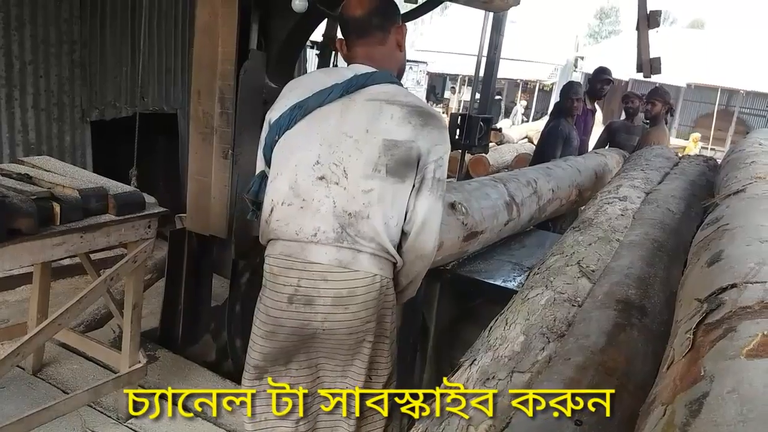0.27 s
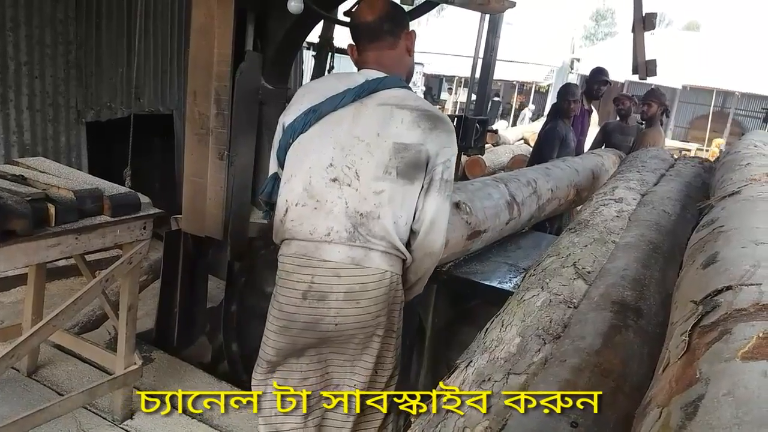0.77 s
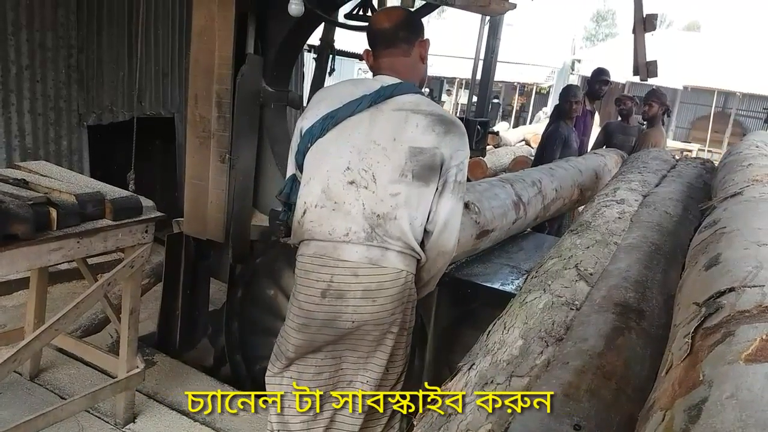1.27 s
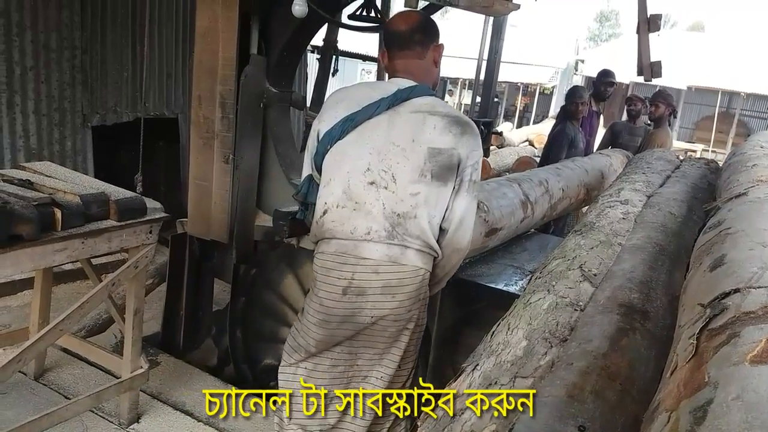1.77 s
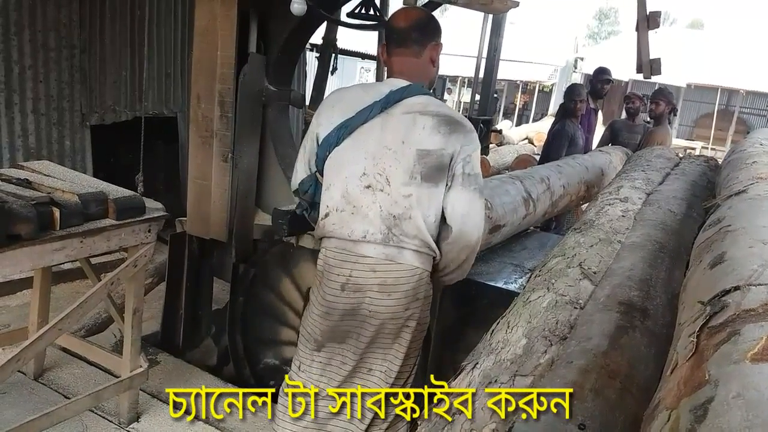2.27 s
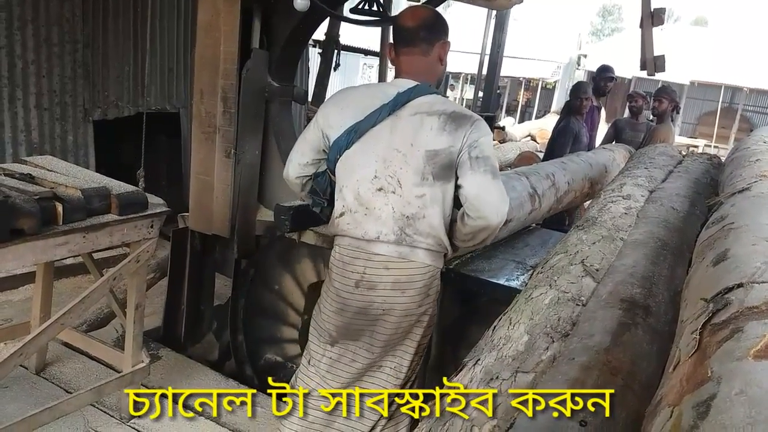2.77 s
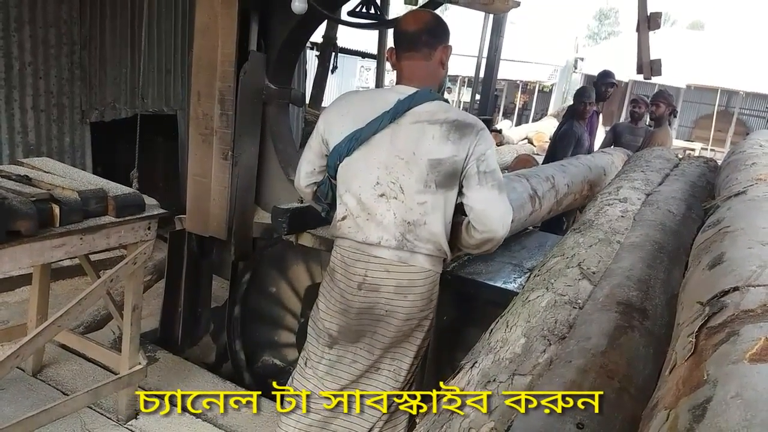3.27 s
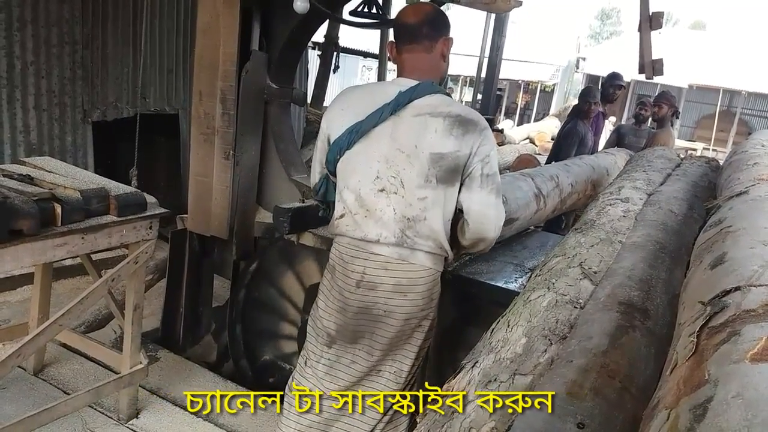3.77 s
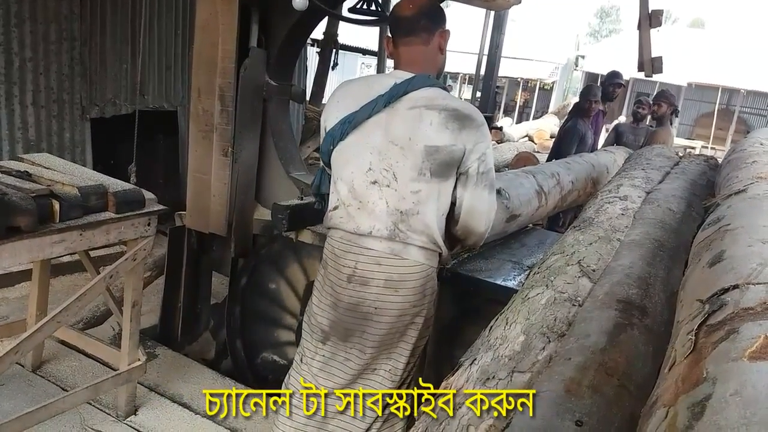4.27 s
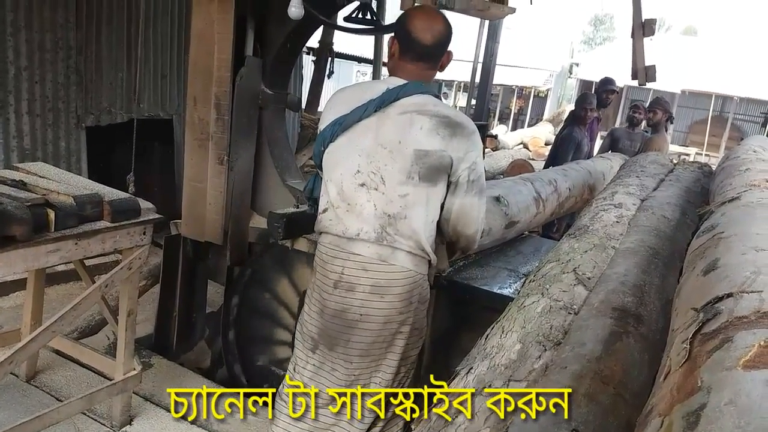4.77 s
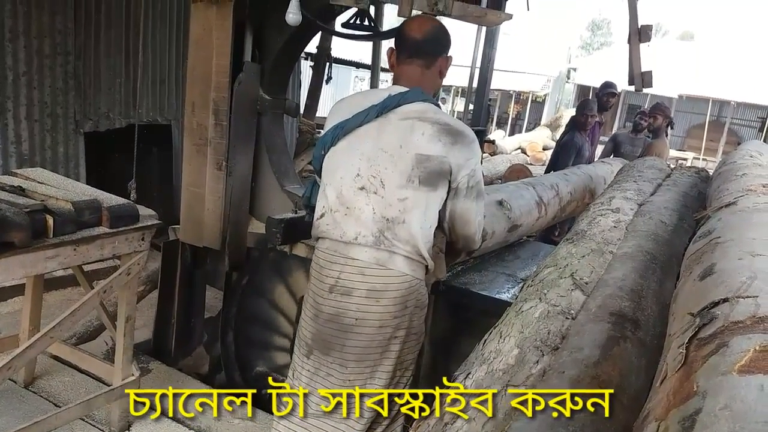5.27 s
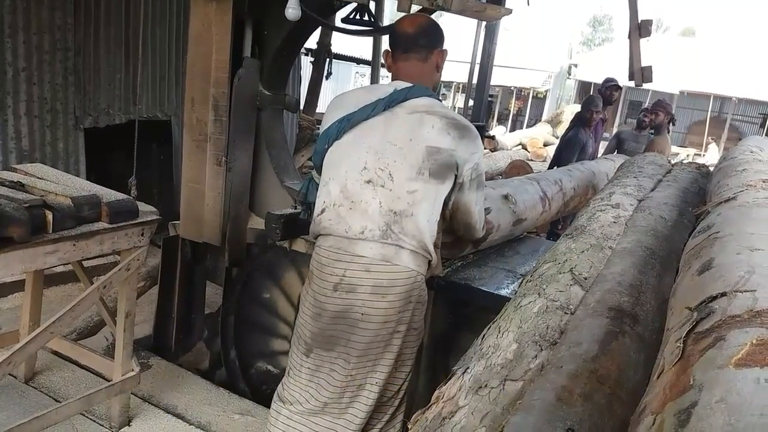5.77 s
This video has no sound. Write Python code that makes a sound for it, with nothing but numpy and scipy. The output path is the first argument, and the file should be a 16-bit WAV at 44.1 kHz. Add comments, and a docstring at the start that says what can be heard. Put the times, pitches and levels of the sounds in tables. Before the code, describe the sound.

A large band saw cuts wood with hissing and short squeals over a chugging diesel engine, then everything fades out.

```python
"""A slow diesel engine drives a band saw through a log in an open shed, heard in mono.
From the start the exhaust throbs in a fixed pattern and the block knocks once a cycle, while the blade
hisses in the wood and rings near 2 kHz. A faint hum stops after half a second. The saw squeals in
clusters and rasps where uneven teeth pass the wood, about every 0.8 s, the engine sagging at nearly
the same pace. From 2.75 s on, the whole scene fades away."""
import sys
import numpy as np
from scipy import signal
from scipy.fft import rfft, irfft, next_fast_len
from scipy.io import wavfile
from scipy.ndimage import uniform_filter1d, map_coordinates

SR = 44100
rng = np.random.default_rng(int(sys.argv[2]) if len(sys.argv) > 2 else 0)


def generate_wav(signal):
    """Clip the signal to [-1, 1] and save it as 16-bit WAV at the path in sys.argv[1]."""
    frames = np.transpose(np.atleast_2d(signal))
    scaled = np.clip(frames, -1, 1) * 32767
    pcm = np.round(scaled).astype(np.int16)
    wavfile.write(sys.argv[1], SR, pcm)


N = 265305
TIME = np.arange(N) / SR

# slow level rides on the engine: t/s, knock level/dB, upper exhaust level/dB
ENGINE_RIDES = [(0, -0.5, -1.5), (.9, 0.5, 0), (1.8, -.5, 0), (2.9, -1.5, 1.5), (3.75, 0, 3.5),
                (4.4, 0.5, 1), (5.1, 1, 0), (6.02, -1, -1)]


def amp(db):
    """Decibels to gain."""
    return 10 ** (np.asarray(db) / 20)


def unit(x):
    """Scaled to rms 1."""
    return x / np.sqrt(np.mean(x ** 2) + 1e-20)


def curve(rows, column=1):
    """One column of a timed table as an automation curve."""
    table = np.array(rows)
    return np.interp(TIME, table[:, 0], table[:, column])


def wobble(rate):
    """Smooth random modulation, rate knots a second."""
    coarse = np.arange(0, N + 64, 64)
    knots = rng.standard_normal(int(N * rate / SR) + 5)
    return np.interp(np.arange(N), coarse, map_coordinates(knots, [coarse * rate / SR]))


def bell(offset, width):
    """A Gaussian swell of height 1, width taken at half height."""
    return np.exp(-4 * np.log(2) * (offset / width) ** 2)


def resonance(f, hz, width):
    """Complex band-pass response of one mode centred on hz."""
    return 1j * f * width / (hz ** 2 - f ** 2 + 1j * f * width)


def filtered(x, response):
    """x through a filter given as a function of frequency."""
    size = next_fast_len(N + SR // 2)
    return irfft(rfft(x, size) * response(np.fft.rfftfreq(size, 1 / SR)), size)[..., :N]


def engine_cycles():
    """Running count of engine cycles: the speed sags and recovers about once per turn of the blade."""
    # slow drift of engine speed: t/s, cycle rate/Hz
    speed = [(0, 11.524), (2.007, 11.359), (4.013, 11.421), (6.02, 11.513)]
    depth_hz, peak_s, period_s = .091, .374, .769
    sway = depth_hz * np.cos(2 * np.pi * (TIME - peak_s) / period_s)
    return .01 + np.cumsum(curve(speed) + sway) / SR


def exhaust(cycle):
    """The throb: harmonics of the cycle rate, phased to follow the pressure blows in the pipe."""
    # blows that ring the pipe: position/cycle, f/Hz, width/Hz, strength (negative = suction)
    thuds = [(0.016, 259, 19, 0.37), (0.196, 170, 24, 0.46), (0.243, 81, 156, 0.13), (0.543, 93, 17, 0.25),
             (0.635, 186, 53, -0.31), (0.771, 70, 50, 0.28), (0.873, 130, 15, 0.5),
             (0.961, 146, 101, -0.35)]
    # exhaust spectrum: multiple of the cycle rate, relative level/dB
    harmonics = [(3, -39.9), (4, -24.3), (5, -17.5), (6, -10.3), (7, -14.0), (8, -12.3), (9, -11.8),
                 (10, -11.7), (11, -16.6), (12, -4.2), (13, -8.6), (14, -18.0), (15, 0.0), (16, -10.4),
                 (17, -20.0), (18, -17.7), (19, -9.4), (20, -12.3), (21, -7.8), (22, -13.6), (23, -6.7),
                 (24, -7.6), (25, -30.7), (26, -9.0), (27, -5.2), (28, -10.8), (29, -15.2), (30, -15.3),
                 (31, -28.4), (32, -19.7), (33, -27.6), (34, -31.0), (35, -19.7), (36, -26.1)]
    position, hz, width, strength = np.transpose(thuds)
    mean_rate = cycle[-1] * SR / N
    upper_db = curve(ENGINE_RIDES, column=2) + 1.2 * wobble(3.86)
    throb = np.zeros(N)
    for k, db in harmonics:
        f = k * mean_rate
        blows = strength * resonance(f, hz, width) * np.exp(-2j * np.pi * k * position)
        shelf = f ** 4 / (f ** 4 + 220 ** 4)
        gain = amp(db + upper_db * shelf + 1.1 * wobble(5))
        throb += gain * np.cos(2 * np.pi * k * cycle + np.angle(blows.sum()) + .12 * wobble(6))
    return amp(-19) * unit(throb)


def block_knock(cycle):
    """Each firing knocks the block: its modes ring, with a rattle dying behind."""
    # modes of the engine block: f/Hz, relative level/dB, t60/s
    modes = [(445, -9, 0.071), (514, -6, 0.17), (624, -16.5, 0.57), (668.7, -2, 0.39), (741.6, -0.5, 0.38),
             (822, 6.5, 0.19), (860, -1, 0.35), (873, -4.5, 0.63), (953, -9, 0.43), (1006, -2, 0.5),
             (1187, -6.5, 0.37), (1594, 1.5, 0.14)]
    hz, db, t60 = np.transpose(modes)[..., None]
    firings = cycle - .41  # the engine fires 41 % into each cycle
    t = np.arange(SR // 4) / SR
    knocks = np.zeros(N + SR)
    for start in np.flatnonzero(np.diff(np.floor(firings))):
        decays = amp(db + rng.normal(0, 2.5, db.shape) + rng.normal(0, 1.9) - 60 * t / t60)
        phases = 2 * np.pi * hz * t + rng.normal(0, .45, db.shape)
        knocks[start:start + len(t)] += np.sum(decays * np.sin(phases), 0)
    noise = filtered(rng.standard_normal(N), lambda f: np.exp(-.5 * (np.log((f + 1) / 950) / .24) ** 2))
    rattle = amp(-16 * (firings % 1)) * noise
    ride = amp(curve(ENGINE_RIDES) + .85 * wobble(4.29))
    return ride * (amp(-27) * unit(knocks[:N]) + amp(-27.5) * unit(rattle))


def wood_cut(accents):
    """Teeth tear the wood: patchy hiss that swells in narrow accents, each with a wavering tone inside."""
    # EQ of the cutting noise: f/Hz, level/dB
    hiss_eq = [(20, -45), (60, -9.5), (300, -2), (420, -5), (580, -7), (1000, -1), (1500, -4), (2100, 0.5),
               (3000, -8.5), (4600, -7), (6000, -9.5), (8000, -20), (11000, -23.5), (14000, -25)]
    # slow ride on the treble: t/s, level/dB
    treble_ride = [(0, .5), (1.2, 1.5), (2.4, -0.5), (3.6, 1), (4.8, 0.8), (6.02, -0.1)]
    hz, frame_s, spectrum = signal.stft(rng.standard_normal(N), SR, nperseg=256, noverlap=192)
    hz = hz[:, None]
    patches = uniform_filter1d(rng.standard_normal(spectrum.shape), 3, axis=0)
    patches = uniform_filter1d(patches, 30, axis=1)
    power = amp(2.4 * unit(patches))
    waver = np.cumsum(wobble(60)) / SR
    tones = np.zeros(N)
    for at, pitch, width, length, db in accents:
        power += amp(db - 2) ** 2 * bell(hz - pitch, width) * bell(frame_s - at, length)
        near = slice(max(round((at - 2 * length) * SR), 0), round((at + 2 * length) * SR))
        swell = amp(db - 18) * np.sqrt(bell(TIME[near] - at, length))
        tones[near] += swell * np.sin(2 * np.pi * (pitch * TIME[near] + .2 * width * waver[near]))
    treble_db = curve(treble_ride) + .45 * wobble(16)  # the treble drifts and trembles
    shelf_db = np.interp(frame_s, TIME, treble_db) * hz ** 2 / (hz ** 2 + 3000 ** 2)
    hiss = signal.istft(spectrum * np.sqrt(power) * amp(shelf_db), SR, nperseg=256, noverlap=192)[1][:N]
    eq_hz, eq_db = np.transpose(hiss_eq)
    return amp(-6) * filtered(hiss + tones, lambda f: amp(np.interp(np.log(f + 1), np.log(eq_hz), eq_db)))


def blade_ring():
    """Two blade tones swell and waver; the rubbing wood keeps the weaker resonances ringing."""
    # weaker blade resonances: f/Hz, width/Hz, relative level/dB
    modes = [(1830, 22, -1), (1857, 41, -13), (2157, 29, -0.5), (2200, 20, 1), (2264, 10, -9),
             (2332, 26, -3)]
    # the two strongest blade tones: f/Hz
    ring_hz = [1966, 2029]
    # swells added to those tones: t/s, lower tone level/dB, upper tone level/dB
    swells = [(.05, -24, -28), (.18, -23, -28), (.25, -25, -31), (.37, -15, -30), (.43, -27, -19),
              (.51, -26, -20), (.77, -28, -31), (1.02, -15, -35), (1.21, -27, -32), (1.449, -21.5, -26),
              (2.26, -27, -40), (2.73, -24, -26), (2.92, -24, -29), (3.53, -21, -32), (3.83, -29, -21),
              (4.13, -28, -28), (4.26, -22, -24), (4.59, -29, -23), (4.78, -19, -26), (4.99, -15, -23),
              (5.19, -31, -23), (5.42, -16, -29), (5.81, -23, -27)]
    resting_db, swell_s = (-27, -29), .044
    rub = rng.standard_normal(N)
    rubbed = filtered(rub, lambda f: sum(amp(db) * resonance(f, hz, width) for hz, width, db in modes))
    ring = amp(-28) * unit(rubbed)
    peak_s, *swell_db = np.transpose(swells)
    steps = np.arange(0, N / SR + .01, .005)
    shapes = bell(steps[:, None] - peak_s, swell_s)
    for hz, rest_db, db in zip(ring_hz, resting_db, swell_db):
        phase = 2 * np.pi * np.cumsum(hz + 6 * wobble(30)) / SR
        envelope = amp(rest_db + .5 * wobble(9)) + np.interp(TIME, steps, shapes @ amp(db))
        flutter = amp(1.8 * wobble(40))
        ring += envelope * flutter * np.sin(phase)
    return ring


def hum():
    """A faint, slightly unsteady tone that stops early."""
    hz, rms_db, hold_s, release_s = 473.5, -30.5, .51, .05
    gate = np.clip((hold_s - TIME) / release_s + 1, 0, 1)
    return gate * amp(rms_db + .58 * wobble(6.6)) * np.sqrt(2) * np.sin(2 * np.pi * hz * TIME)


def tooth_rasps():
    """Accents for the cut: uneven stretches of teeth rasp once a turn, a little differently each time."""
    # uneven stretches: t/s into the turn, f/Hz, width/Hz, length/s, relative level/dB
    teeth = [(0.068, 7760, 800, 0.081, 5), (0.158, 7000, 1100, .045, 7), (.43, 5400, 900, 0.097, 2)]
    # turns of the blade: start t/s, rasp level/dB
    turns = [(-.35, -8), (.454, -7), (1.247, 0), (2.04, 1), (2.838, 0.5), (3.63, -1.5), (4.39, -1),
             (5.19, -4)]
    accents = []
    for start, turn_db in turns:
        for delay, hz, width, length, db in teeth:
            pitch = hz * (1 + rng.normal(0, .03))
            level_db = db + turn_db + rng.normal(0, 1.5)
            if start + delay > 0:
                accents.append((start + delay, pitch, width, length, level_db))
    return accents


def tooth_squeals(width_hz=570):
    """Accents for the cut: teeth squeal in the wood in short, loud clusters."""
    # squeals: t/s, f/Hz, length/s, relative level/dB
    squeals = [(0.1, 4080, .05, 6.5), (.147, 4390, .04, 7), (.223, 4180, .034, 5), (.296, 4390, .035, 6),
               (.755, 3960, .03, 8.5), (0.86, 4100, 0.044, 8.5), (.896, 4900, 0.067, 7),
               (.956, 4170, .07, 3), (1.034, 4500, 0.04, 10.5), (1.25, 4820, 0.022, 9),
               (1.553, 3640, .02, 11.5), (1.59, 4870, 0.021, 15), (1.625, 4100, .06, 4),
               (1.695, 5650, .05, 2), (1.752, 4990, 0.019, 5), (1.827, 4670, .03, 13.5),
               (2.38, 5030, .021, 12.5), (2.482, 6000, .046, 6), (2.547, 4390, 0.018, 12),
               (2.621, 4830, 0.058, 12.5), (2.694, 4300, .044, 6), (2.847, 5510, .03, 9.5),
               (3.16, 5050, .04, 9.5), (3.26, 5340, .06, 4.5), (3.344, 4700, 0.019, 9),
               (3.418, 4780, .041, 12.5), (3.638, 4940, .03, 3), (4.055, 4870, .028, 3),
               (4.2, 4700, 0.055, 7.5), (4.898, 4730, .034, 6), (4.968, 4900, .028, 9),
               (5.2, 5300, .045, 7)]
    return [(at, hz, width_hz, length, db) for at, hz, length, db in squeals]


def scene():
    """Engine, saw and hum in one mono mix, the same on both channels."""
    cycle = engine_cycles()
    engine = exhaust(cycle) + block_knock(cycle)
    saw = wood_cut(tooth_squeals() + tooth_rasps()) + blade_ring()
    mono = engine + saw + hum()
    return np.array([mono, mono])


def record(dry):
    """A linear fade over a slight, steady drop in level, then a brick-wall low-pass."""
    fade_start_s, fade_end_s, slope_db_per_s, cutoff_hz = 2.75, 6.474, -.35, 13080
    fade = np.clip((fade_end_s - TIME) / (fade_end_s - fade_start_s), 0, 1)
    return filtered(dry * fade * amp(slope_db_per_s * TIME), lambda f: f < cutoff_hz)


dry = scene()
out = record(dry)
generate_wav(out)
```